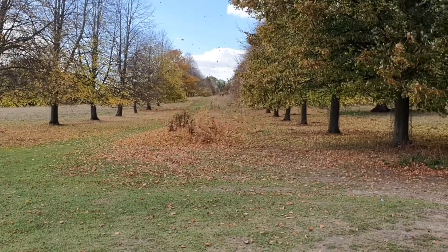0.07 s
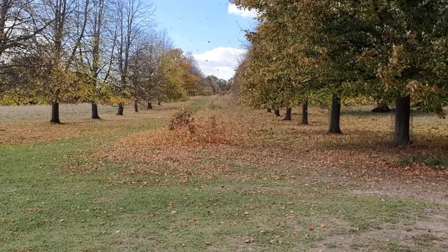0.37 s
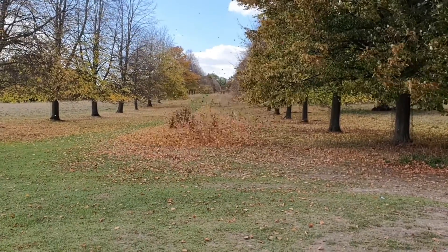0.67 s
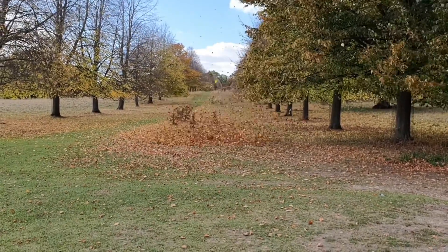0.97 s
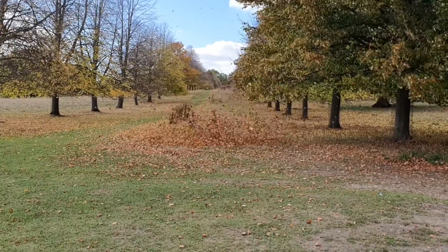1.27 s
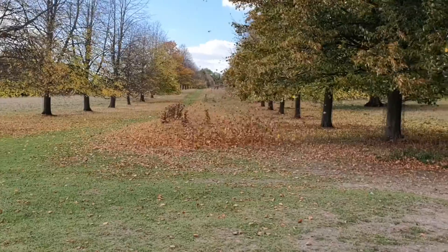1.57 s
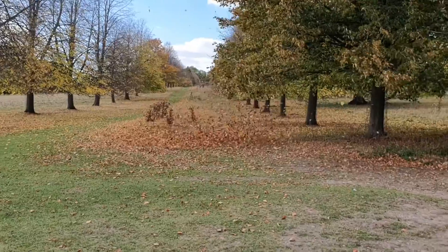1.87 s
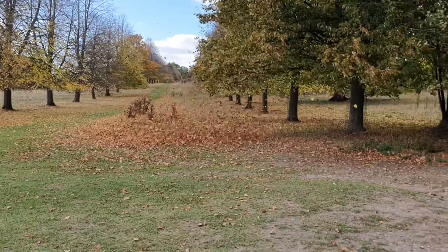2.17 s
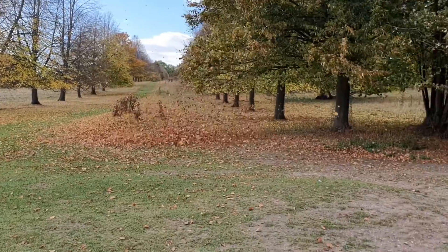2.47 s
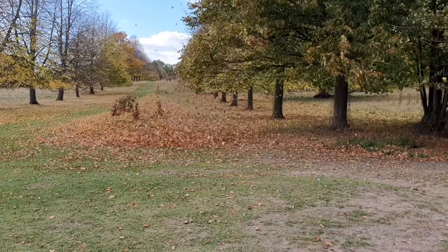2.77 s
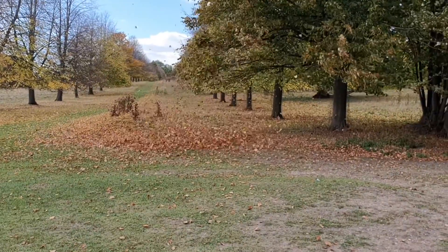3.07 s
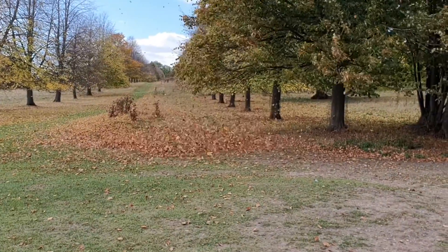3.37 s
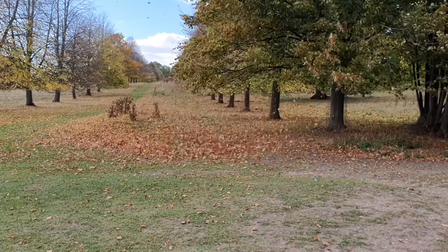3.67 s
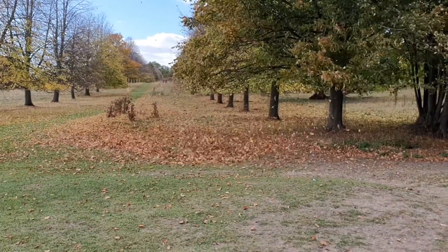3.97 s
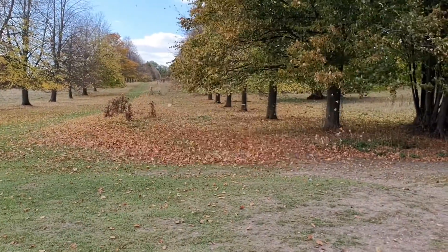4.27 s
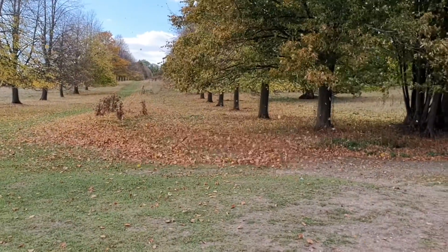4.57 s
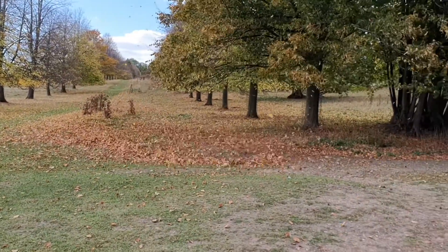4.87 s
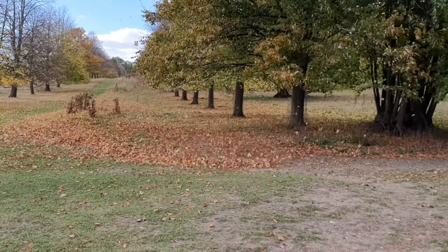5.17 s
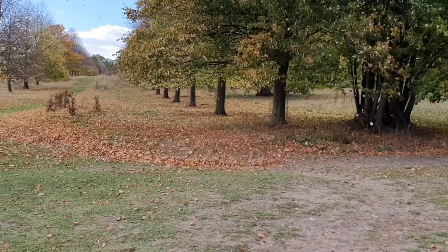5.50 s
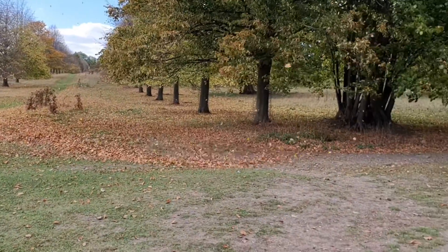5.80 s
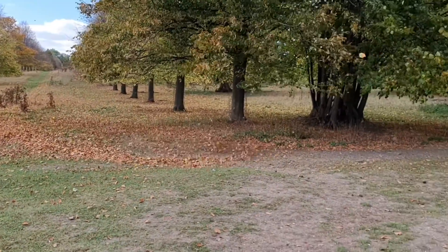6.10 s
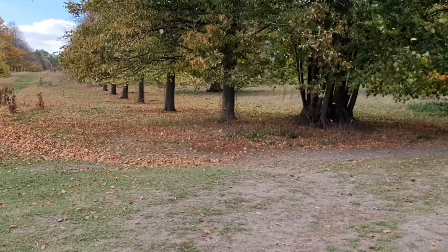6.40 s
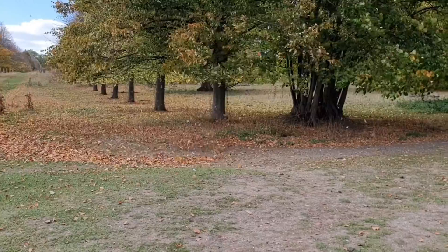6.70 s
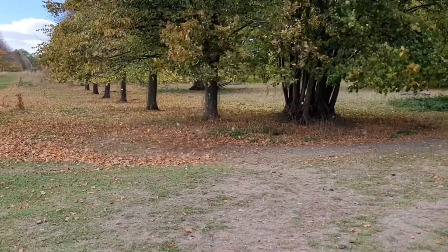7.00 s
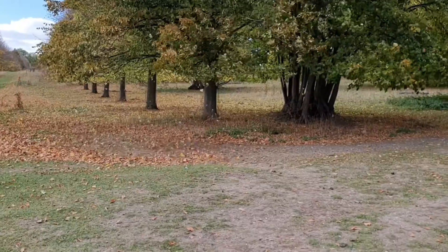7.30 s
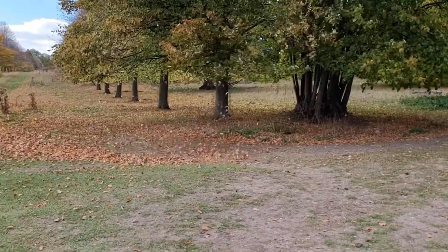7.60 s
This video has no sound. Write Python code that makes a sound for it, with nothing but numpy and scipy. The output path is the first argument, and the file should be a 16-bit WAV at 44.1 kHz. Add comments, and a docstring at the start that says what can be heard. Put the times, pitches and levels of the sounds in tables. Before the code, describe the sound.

Dry leaves rustle and hiss in a breeze while wind rumbles and flutters on the microphone, growing gustier as the leaves settle.

```python
"""Dry leaves in an autumn park, some way off the microphone, on the ground and up in the trees.
A breeze stirs them: the nearer ones tick and scrape, the countless far ones merge into a hiss.
Right at the microphone the same wind tumbles over the two ports as a lumpy rumble and a flutter
that brightens with each gust, with dull puffs, crackles and one hollow blast.
Towards the end the leaves settle while the gusts at the microphone grow."""
import sys
import numpy as np
from scipy import signal
from scipy.fft import rfft, irfft, next_fast_len
from scipy.io import wavfile
from scipy.ndimage import uniform_filter1d, map_coordinates

SR = 44100
rng = np.random.default_rng(int(sys.argv[2]) if len(sys.argv) > 2 else 0)


def write(x):
    x = np.atleast_2d(x).T
    wavfile.write(sys.argv[1], SR, np.round(np.clip(x, -1, 1) * 32767).astype(np.int16))


N = 346185
TIME = np.arange(N) / SR
FFT_SIZE = next_fast_len(N, True)
FREQS = np.maximum(np.fft.rfftfreq(FFT_SIZE, 1 / SR), 1)
CUTOFF_HZ = 15750

# Colours are relative levels per Hz; balance is left port minus right port.
# colour of the leaves from where the microphone stands: f/Hz, level/dB
LEAF_COLOUR = [(500, -22), (1100, -5.5), (1430, -7.5), (1620, -3), (1790, -5.5), (1960, -2.5), (2120, -6),
               (2300, -3), (2600, -6.5), (2820, -4.5), (3020, -0.5), (3280, 2.2), (3600, 1.8), (4250, 1.1),
               (4750, -1.4), (5300, -4.5), (6120, -2), (6900, -6.5), (7700, -8), (8300, -12), (9400, -7),
               (13000, -7.5), (15700, -9.5)]
# how alike the rustle is at the two ports: f/Hz, likeness/0-1
LEAF_LIKENESS = [(800, 0.5), (1800, 0.7), (2600, 0.23), (3250, 0.73), (4000, 0.65), (5000, 0.3),
                 (6200, 0.46), (7800, 0.16), (11000, 0.28), (15500, 0.1)]
# the microphone body between the ports bends the sound: f/Hz, lead of the left port/rad
LEAF_PHASE = [(1100, 0.55), (2000, -0.042), (3500, -0.046), (6200, -0.11), (9000, -0.97), (13000, -1.3)]
# where the rustle sits between left and right: f/Hz, balance/dB
LEAF_BALANCE = [(1000, -1.5), (2800, 0), (3700, -2), (5200, 0.5), (7000, 0), (8400, 0.5), (12000, -0.5)]
# the loudest leaves are nearly on axis and twice swing out to the left: t/s, right port lag/us
LEAF_BEARING = [(0, 14), (0.8, 7.2), (1.7, 40), (2.25, 68), (2.6, 73), (3.05, 34), (3.8, 17), (4.3, 33),
                (5.7, 8.7), (6.2, 26), (7.0, 92), (7.85, 23)]
# the microphone turns slowly and the rustle changes colour: f/Hz, gain from start to end/dB
TURN_COLOUR = [(1100, 19), (1750, -0.5), (2100, -7.5), (2500, -1.5), (3000, -1), (3600, -2), (4300, -0.5),
               (5300, 4), (7000, 2), (9000, 7)]
# the peaks and dips of the rustle slide as the microphone tilts and turns: t/s, shift/%
COLOUR_SHIFT = [(0, -0.5), (1.0, -2), (2.5, -2.5), (3.3, 0.14), (4.0, 2.5), (4.8, 0.96), (5.5, 2.4),
                (6.3, 0.4), (7.85, 0)]
# a surface close behind the microphone throws the rustle back: t/s, delay/us
NEAR_ECHO = [(0, 2850), (0.7, 2600), (1.6, 3700), (3.0, 2800), (4.0, 2480), (5.2, 2200), (7.85, 2700)]
# how hard the breeze stirs the leaves between flurries: t/s, rustle level/dB, sizzle level/dB
LEAF_STIR = [(0.0, -48, -49.5), (0.24, -48.7, -51.5), (0.66, -50, -54.5), (1.08, -48, -51.5),
             (1.46, -46.5, -50), (1.7, -45, -50.5), (1.83, -46.5, -50), (1.95, -49, -52.5),
             (2.05, -47, -49.5), (2.45, -46, -49.5), (2.6, -46, -49.5), (3.0, -44, -48.5),
             (3.22, -46, -50.5), (3.5, -46.5, -51.5), (3.88, -46, -52), (4.05, -45.5, -50),
             (4.6, -45.5, -50), (5.36, -46, -51.5), (5.55, -51, -54.5), (5.8, -49.5, -54.5),
             (5.9, -51.5, -55), (6.1, -49.5, -54.5), (6.48, -50.5, -56), (6.56, -52.5, -56),
             (6.82, -52, -56.5), (7.1, -56, -60), (7.4, -57.5, -58.5), (7.85, -55.5, -60)]
# a patch of leaves lifts and settles: middle t/s, half length/s, rise/dB
FLURRIES = [(0.32, 0.024, 3.5), (0.504, 0.14, 6.5), (0.746, 0.046, 5.5), (0.897, 0.11, 5.5),
            (1.18, 0.049, 1), (1.354, 0.06, 3.5), (1.614, 0.11, 2), (2.045, 0.13, 3.5), (2.34, 0.07, 2),
            (2.554, 0.062, 3.5), (2.72, 0.072, 3.5), (2.886, 0.055, 1.4), (3.134, 0.055, 3.4),
            (3.343, 0.064, 4.5), (3.586, 0.04, 4.5), (3.755, 0.02, 4), (3.95, 0.03, 1), (4.223, 0.076, 0.5),
            (4.66, 0.05, 0.5), (5.304, 0.099, 2), (6.151, 0.045, 3), (6.33, 0.066, 4), (6.46, 0.032, 3)]
# colour of the faint hiss behind the leaves: f/Hz, level/dB
HISS_COLOUR = [(1000, 13), (2600, 12.5), (3700, 13), (5300, -3), (6200, 10.5), (8400, 10), (15000, -14)]

# gusts reach the microphone: start t/s, length/s, relative airflow/dB, relative rumble/dB
GUSTS = [(0.0, 0.026, -29.5, -26.5), (0.287, 0.061, -43, -21.5), (0.475, 0.083, -54, -21.5),
         (0.675, 0.028, -40, -45), (0.795, 0.13, -41.5, -24.5), (0.953, 0.11, -39.5, -32),
         (1.188, 0.01, -57, -25), (1.595, 0.1, -65, -28), (1.772, 0.024, -39.5, -33),
         (1.972, 0.15, -39, -33.5), (2.322, 0.084, -32.5, -25), (2.457, 0.17, -33, -26.5),
         (2.665, 0.07, -34.5, -24.5), (2.8, 0.25, -42, -28), (3.273, 0.037, -34, -18.5),
         (3.348, 0.14, -29, -25), (3.557, 0.049, -33.5, -23.5), (3.713, 0.065, -35, -22),
         (4.023, 0.028, -30.5, -44), (4.09, 0.12, -31.5, -22.5), (4.469, 0.022, -24.5, -24),
         (4.532, 0.055, -34, -24), (4.578, 0.15, -32, -26.5), (4.835, 0.058, -30.5, -22),
         (4.979, 0.054, -27, -19), (5.095, 0.034, -28, -35), (5.249, 0.13, -28.5, -24),
         (5.436, 0.25, -32.5, -32), (5.748, 0.092, -55, -26.5), (6.073, 0.095, -28.5, -28),
         (6.23, 0.12, -33.5, -33), (6.518, 0.12, -29.5, -30), (6.676, 0.11, -25.5, -26),
         (6.794, 0.087, -23.5, -23.5), (6.933, 0.071, -29.5, -23.5), (7.147, 0.03, -28.5, -25.5),
         (7.352, 0.3, -28.5, -32), (7.424, 0.083, -19, -29.5)]
# rumble of the ports between gusts: t/s, relative level/dB
LULL_RUMBLE = [(0, -28.5), (2.2, -31.5), (3.0, -29), (3.65, -31), (4.3, -28.5), (6.3, -29.5), (7.1, -30.5),
               (7.6, -31.5), (7.85, -34)]
# colour of the large eddies: f/Hz, level/dB
RUMBLE_COLOUR = [(20, -19), (35, -16), (60, -1.5), (92, -2.5), (125, -8), (165, -9.5), (220, -13),
                 (330, -27)]
# airflow over the ports between gusts: t/s, relative level/dB
LULL_AIRFLOW = [(0.0, -42), (1.4, -45.5), (2.6, -42), (3.65, -42), (4.42, -36.5), (4.78, -31), (5.07, -38),
                (5.5, -28.5), (5.9, -36), (6.4, -33.5), (7.1, -38), (7.35, -29.5), (7.85, -41.5)]
# the side of the microphone that the airflow favours: t/s, balance/dB
WIND_SIDE = [(0, 2.5), (.6, -0.5), (2, -3.5), (3, 1), (3.9, -0.5), (4.4, -1), (5.4, -1), (6.3, -3.5),
             (7.0, -5), (7.25, 3), (7.85, 3)]
# colour of the small eddies: f/Hz, level/dB
FLUTTER_COLOUR = [(130, -10), (200, -1), (280, 5), (390, 3.5), (500, -4), (750, -16.5), (1050, -31.5),
                  (1500, -39), (2200, -49), (3600, -67)]
# the right port is more exposed to all but the lowest flutter: f/Hz, balance/dB
FLUTTER_BALANCE = [(220, 10.5), (400, -4.5), (650, -4.5), (1200, -15), (3000, -11)]
# small eddies gain most from a gust: f/Hz, response/dB per dB of airflow
GUST_RESPONSE = [(270, 0.6141), (450, 1.0471), (900, 1.1878)]
# the ports ring when the air hits them hard: f/Hz, width/Hz, relative level/dB
PORT_MODES = [(327, 127, 11.5), (793, 120, 0.5), (1030, 135, -5.5), (1330, 400, -26.5)]
# brief puffs of air slap the ports: t/s, level/dB, balance/dB
PUFFS = [(0.225, -41, 0), (0.283, -32.5, -5), (0.49, -31, -2), (0.73, -40, -2), (0.866, -31, -1),
         (1.203, -34, 4), (1.562, -29.5, -3), (1.624, -53, -10), (1.717, -44, -18), (1.787, -28.5, -8),
         (1.848, -48, 7), (2.296, -33.5, -3), (2.353, -30, 4), (2.413, -32, -2), (2.484, -29, -7),
         (2.6, -31, -3), (2.833, -27, -7), (3.44, -36, -8), (3.475, -32, -9), (3.814, -30.5, -1),
         (4.203, -25, -10), (4.493, -27, -7), (4.616, -27, 0), (4.706, -28, -6), (5.381, -23.5, -8),
         (5.487, -47, 2), (6.039, -34, 6), (6.234, -26.5, -9.5), (6.322, -32.5, -10), (6.732, -25, -2),
         (6.855, -21, -1), (6.945, -22.5, 1), (7.181, -25, 6), (7.272, -32, -9), (7.378, -28.5, -6),
         (7.598, -27, 6), (7.652, -39, 2), (7.72, -31, -10)]
# colour of a puff: f/Hz, level/dB
PUFF_COLOUR = [(100, -18), (250, 6.5), (400, 4.5), (500, -2.5), (750, -20), (1100, -29), (2200, -72),
               (6000, -75)]
# single eddies hit the ports, the large ones low and slow: t/s, relative level/dB, f/Hz, balance/dB
EDDIES = [(0.328, -10.5, 81, -2), (0.849, -7, 72, 12), (1.38, -10.5, 98, 3.5), (1.571, -14.5, 162, -2),
          (2.357, -15, 160, 10), (2.36, -4, 74, 4), (2.471, -24, 280, -8), (2.563, -10, 74.5, -5),
          (2.715, -6, 94, 3), (2.734, -10, 67.7, -4), (2.747, -7, 141, -5), (2.862, -12, 84, 1),
          (3.313, -11, 82, -10), (3.407, -2, 92, -8), (3.42, -2, 166, -4), (3.572, 0.5, 74, 9),
          (3.603, -6, 90, 5), (4.12, -12, 99, -11), (4.192, -11, 151, 16), (4.621, -12, 92, -8),
          (4.679, -11.5, 487, -13), (4.69, -5.5, 155, 4.5), (4.719, -15, 71, 9), (4.901, -11, 103, 21),
          (5.008, -23, 125, -3), (5.038, -18, 200, 0), (5.144, -16.5, 78, 5), (5.38, 2, 104, 1),
          (5.4, -11, 450, 4), (5.549, -9.5, 68.5, 2), (5.623, -16, 453, -3), (5.756, -22, 150, -5),
          (6.115, -17, 301, 0), (6.356, -15, 493, -11), (6.542, -11.5, 390, 12), (6.587, -5, 377, 1),
          (6.617, -1.5, 360, -5.5), (6.671, -6, 75.5, -3), (6.725, -12, 440, 0), (6.811, -4, 107, -3),
          (6.842, -7, 100, 14), (6.886, -7.5, 109, 14), (6.989, -4, 340, -1), (7.185, -13, 172, -8),
          (7.5, -18, 92, 1), (7.605, -3, 436, 0)]
# the fastest air tears at the ports: t/s, level/dB, balance/dB
CRACKLES = [(2.488, -39, -9), (2.503, -34, -9), (2.555, -36, -10), (3.51, -32, -5), (4.492, -33, -7),
            (4.499, -32, -7), (4.679, -29, -12), (4.883, -31, -6), (5.401, -35, 3), (5.625, -30, -4),
            (6.114, -34, -6), (6.703, -35, -13), (6.713, -36, -14), (6.743, -37, -8), (6.776, -38, -5),
            (6.82, -34, -15), (6.831, -35, -9), (6.853, -29, -15), (6.887, -30, -16), (6.976, -40, -9),
            (7.024, -33, -10), (7.084, -40, -6), (7.303, -40, 5), (7.413, -49, -4), (7.436, -39, -6),
            (7.449, -36, -8), (7.474, -30, 3), (7.525, -47, -3)]
# colour of a crackle: f/Hz, level/dB
CRACKLE_COLOUR = [(200, -8), (700, 8), (1500, -9.5), (2500, -15.5), (3800, -21), (6000, -34), (12000, -55)]
# the hardest gust blows across the ports: t/s, level/dB, balance/dB
BLAST = [(7.477, -20.5, 2)]
# colour of the blast: f/Hz, level/dB
BLAST_COLOUR = [(300, -7), (550, -7), (790, 9.5), (1000, 0), (1150, -14), (1700, -14), (2400, -36.5),
                (4000, -52), (8000, -68)]


def from_db(db):
    """Decibels to gain."""
    return np.exp(np.asarray(db) * (np.log(10) / 20))


def unit_rms(x):
    """Scale to unit rms."""
    return x / np.sqrt(np.mean(x ** 2) + 1e-20)


def in_time(rows):
    """Each column of a time table at every sample."""
    times, *columns = np.transpose(rows)
    return [np.interp(TIME, times, column) for column in columns]


def in_frequency(rows):
    """A frequency table at every bin, read on a log axis."""
    hz, values = np.transpose(rows)
    return np.interp(np.log(FREQS), np.log(hz), values)


def pan(balance_db):
    """Split a balance into dB for the left and the right port."""
    return balance_db * np.array([[.5], [-.5]])


def drift(rate):
    """A smooth random curve of unit rms, changing about `rate` times a second."""
    step, run_in = 20, 4000
    pole = np.exp(-2 * np.pi * step * rate / SR)
    noise = rng.standard_normal(N // step + run_in + 2)
    slow = signal.lfilter([1], [1, -2 * pole, pole * pole], noise)[run_in:]
    return np.interp(np.arange(N) / step, np.arange(len(slow)), unit_rms(slow))


def port_drift(rate):
    """A separate drift for each port."""
    return np.array([drift(rate), drift(rate)])


def filtered(x, gain):
    """Apply a gain per frequency."""
    spectrum = rfft(x.astype(np.float32), FFT_SIZE) * gain
    return irfft(spectrum.astype(np.complex64), FFT_SIZE)[..., :N]


def port_noise(gain):
    """Separate coloured noise for each port."""
    return filtered(rng.standard_normal((2, N)), gain)


def leaf_ticks(unevenness=1.5, t60_s=0.054, count=10000, tick_samples=440):
    """Leaf edges touch at random moments; each touch rings briefly at that leaf's own pitch."""
    when, pitch, strength, phase = rng.random((4, count, 1), dtype=np.float32)
    hz = 1300 + 14000 * pitch ** 1.3
    age = np.arange(tick_samples, dtype=np.float32) / SR
    height = from_db(-unevenness * np.log(strength + .02))   # a few touches stand out
    ticks = height * np.exp(-np.log(1000) * age / t60_s) * np.sin(2 * np.pi * (hz * age + phase))
    samples = (when * N).astype(int) + np.arange(tick_samples)
    return unit_rms(np.bincount(samples.ravel(), ticks.ravel(), N)[:N])


def lagged(x, lag_us):
    """Delay by a time that changes slowly."""
    return map_coordinates(x, [np.arange(N) - lag_us * 1e-6 * SR], order=3, mode="mirror")


def at_ports(left, unrelated):
    """The right port hears part of what the left does, shifted by the body and the leaves' bearing."""
    likeness = np.clip(in_frequency(LEAF_LIKENESS), 0, 1)
    shared = filtered(left, likeness * np.exp(-1j * in_frequency(LEAF_PHASE)))
    right = shared + filtered(unrelated, np.sqrt(1 - likeness ** 2))
    lag_us, = in_time(LEAF_BEARING)
    return np.array([left, lagged(right, lag_us)])


def microphone_turn(rustle):
    """As the microphone turns, one colour fades into another and the peaks and dips slide together."""
    change_db = in_frequency(TURN_COLOUR)
    start, end = filtered(rustle, from_db(-change_db / 2)), filtered(rustle, from_db(change_db / 2))
    progress = TIME / TIME[-1]
    turned = (1 - progress) * start + progress * end
    shift_percent, = in_time(COLOUR_SHIFT)
    ahead_us = np.cumsum(shift_percent / 100) / SR * 1e6
    return np.array([lagged(port, -ahead_us) for port in turned])


def near_echo(rustle, level_db=-18):
    """One faint reflection from just behind the microphone combs the rustle with fine ripples."""
    delay_us, = in_time(NEAR_ECHO)
    echo = np.array([np.interp(TIME - delay_us / 1e6, TIME, port) for port in rustle])
    return rustle + from_db(level_db) * echo


def leaf_levels(usual_crowns_db=-56, usual_rustle_db=-48, crowns_follow=0.99, flurry_share=0.81):
    """Flurries ride on the slow stirring: dB of the dull tree crowns, the rustle and the crisp sizzle."""
    rustle_db, sizzle_db = in_time(LEAF_STIR)
    crowns_db = usual_crowns_db + crowns_follow * (rustle_db - usual_rustle_db)
    lift_db = sum(db * np.exp(-((TIME - s) / half_length) ** 2) for s, half_length, db in FLURRIES)
    return crowns_db + flurry_share * lift_db, rustle_db + lift_db, sizzle_db + flurry_share * lift_db


def leaves(near_db=-4.0, patchy_db=0.74, shiver_db=0.87, band_edges_hz=(2600, 8300)):
    """Near leaves tick over the smooth hiss of far ones, all swelling in small flurries."""
    near = from_db(near_db) * np.array([leaf_ticks(), leaf_ticks()])
    far = rng.standard_normal((2, N))
    colour = from_db(in_frequency(LEAF_COLOUR) + pan(in_frequency(LEAF_BALANCE)))
    rustle = filtered(at_ports(*(near + far)), colour)
    rustle = near_echo(microphone_turn(rustle))
    shared_db = shiver_db * drift(rate=38)
    crowns, below_sizzle = (1 / (1 + (FREQS / edge) ** 20) for edge in band_edges_hz)
    out = 0
    for band, level_db in zip([crowns, below_sizzle - crowns, 1 - below_sizzle], leaf_levels()):
        swell = from_db(level_db + shared_db + patchy_db * port_drift(rate=15))
        out += unit_rms(filtered(rustle, band)) * swell
    return out


def faint_hiss(level_db=-59.0):
    """An even background hiss that stays when the leaves settle."""
    colour = from_db(in_frequency(HISS_COLOUR)) * (FREQS < CUTOFF_HZ)
    return from_db(level_db) * unit_rms(port_noise(colour))


def gust_level(lull, peaks_db, attack_s=0.043, release_s=0.041):
    """Each gust rises, holds and dies away on top of the breeze; the sum in dB."""
    lull_db, = in_time(lull)
    power = from_db(lull_db) ** 2
    for (start, length, *_), peak_db in zip(GUSTS, peaks_db):
        span = (TIME > start - attack_s) & (TIME < start + length + 10 * release_s)
        age = TIME[span] - start
        attack = np.clip(age / attack_s + .5, 0, 1)
        release = np.exp(-np.maximum(age - length, 0) / release_s)
        power[span] += (from_db(peak_db) * attack * release) ** 2
    return 10 * np.log10(power)


def rumble(gain_db=-1.5, balance_db=-1.5, lumps_db=6.0, lump_limit=1.7, steadiness=0.3, wander_db=0.76):
    """Large eddies press on each microphone port in uneven lumps."""
    swell_db = gust_level(LULL_RUMBLE, [rumble_db for *_, rumble_db in GUSTS])
    swell_db = swell_db + wander_db * port_drift(rate=4)
    passband = FREQS / (FREQS + 8) / (1 + (FREQS / 450) ** 4)
    air = port_noise(from_db(in_frequency(RUMBLE_COLOUR)) * passband)
    # eddies of like strength follow one another
    air = air / uniform_filter1d(air ** 2, size=2600) ** (steadiness / 2)
    lumps = from_db(lumps_db * np.minimum(port_drift(rate=35.6), lump_limit))
    return from_db(swell_db + gain_db + pan(balance_db)) * unit_rms(air * lumps)


def airflow(mean_gust_db=-35, swirl_db=1.56, rasp_db=4.0):
    """The turbulent flow over each port, in dB above a mean gust."""
    gust_db = gust_level(LULL_AIRFLOW, [airflow_db for _, _, airflow_db, _ in GUSTS])
    side_db, = in_time(WIND_SIDE)
    turbulence_db = swirl_db * port_drift(rate=19) + rasp_db * np.minimum(port_drift(rate=115), 2)
    return gust_db - mean_gust_db + pan(side_db) + turbulence_db


def port_ring(airflow_db, gain_db=-19.0, response=1.33):
    """The hollow ring of the ports comes out only in the hardest gusts."""
    modes = sum(from_db(db) / (1 + ((FREQS - hz) / width) ** 2) ** 2 for hz, width, db in PORT_MODES)
    return unit_rms(port_noise(modes)) * from_db(gain_db + response * airflow_db)


def flutter(gain_db=-36.5):
    """Small eddies right on the microphone: faster air is both louder and brighter."""
    airflow_db = airflow()
    colour = from_db(in_frequency(FLUTTER_COLOUR) + pan(in_frequency(FLUTTER_BALANCE)))
    passband = 1 / (1 + (FREQS / 4500) ** 4) / (1 + (90 / FREQS) ** 2)
    air = unit_rms(port_noise(colour * passband))
    buffets = 0
    for centre_hz, response in GUST_RESPONSE:
        band = in_frequency([(hz, hz == centre_hz) for hz, _ in GUST_RESPONSE])   # bands sum to one
        buffets += filtered(air, band) * from_db(response * airflow_db)
    return from_db(gain_db) * (buffets + port_ring(airflow_db))


def bursts(rows, colour, half_length_s):
    """Short swells of coloured turbulence at the ports, one for each row."""
    air = port_noise(from_db(in_frequency(colour)))
    air = air / np.sqrt(uniform_filter1d(air ** 2, size=900) + 1e-20)   # of even strength
    swells = np.zeros((2, N))
    for s, db, balance_db in rows:
        span = np.abs(TIME - s) < 4 * half_length_s
        envelope = np.exp(-((TIME[span] - s) / half_length_s) ** 2)
        swells[:, span] += from_db(db + pan(balance_db)) * envelope
    return air * swells


def puffs():
    """Each puff is a dull, hollow flap of air against the microphone."""
    return bursts(PUFFS, PUFF_COLOUR, half_length_s=0.0077)


def eddies(gain_db=-7.5, half_length_cycles=0.52, shortest_half_s=0.0018):
    """A single eddy is a pressure wave of a cycle or two that meets each port in a phase of its own."""
    out = np.zeros((2, N))
    for (s, peak_db, hz, balance_db), phase in zip(EDDIES, rng.random((len(EDDIES), 2, 1))):
        half_length = max(half_length_cycles / hz, shortest_half_s)   # the ports keep small ones ringing
        span = np.abs(TIME - s) < 4 * half_length
        t = TIME[span] - s
        wave = np.exp(-(t / half_length) ** 2) * np.cos(2 * np.pi * (hz * t + phase))
        out[:, span] += from_db(gain_db + peak_db + pan(balance_db)) * wave
    return out


def crackles():
    """Fast air tears at the ports in a few milliseconds of bright turbulence."""
    return bursts(CRACKLES, CRACKLE_COLOUR, half_length_s=0.0012)


def blast():
    """In the hardest gust the ports sound briefly like a blown pipe."""
    return bursts(BLAST, BLAST_COLOUR, half_length_s=0.0095)


def scene():
    """Leaves in the distance, wind right on the microphone."""
    return leaves() + faint_hiss() + rumble() + flutter() + eddies() + puffs() + crackles() + blast()


def record(dry):
    """The top of the microphone signal is cut steeply."""
    return filtered(dry, 1 / np.sqrt(1 + (FREQS / CUTOFF_HZ) ** 400))


dry = scene()
out = record(dry)
write(out)
```